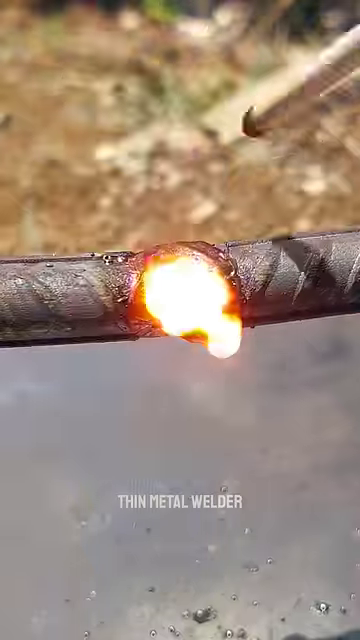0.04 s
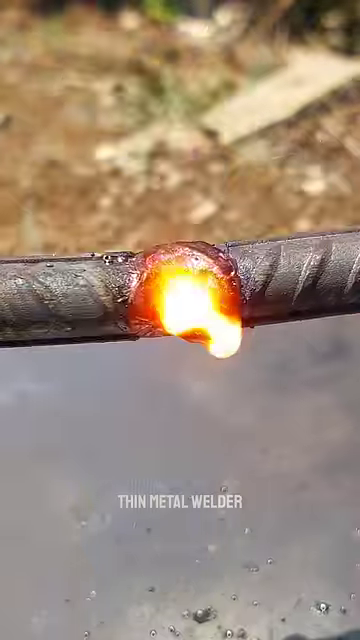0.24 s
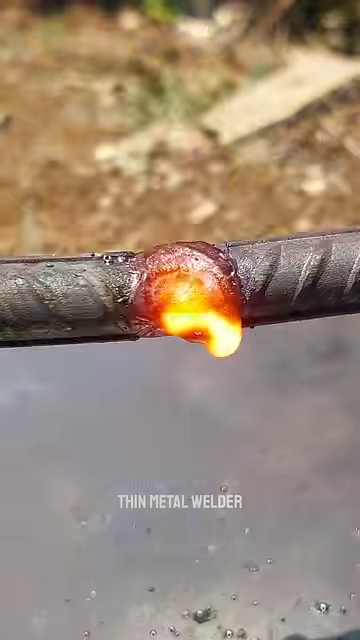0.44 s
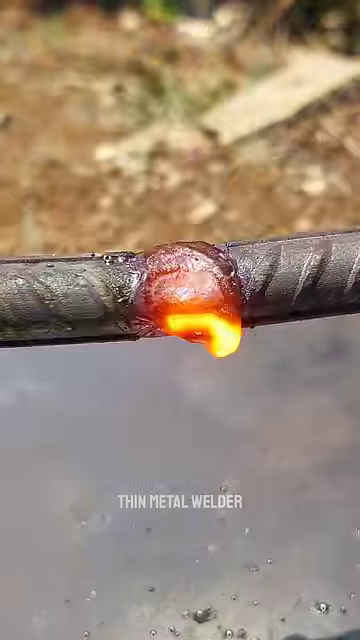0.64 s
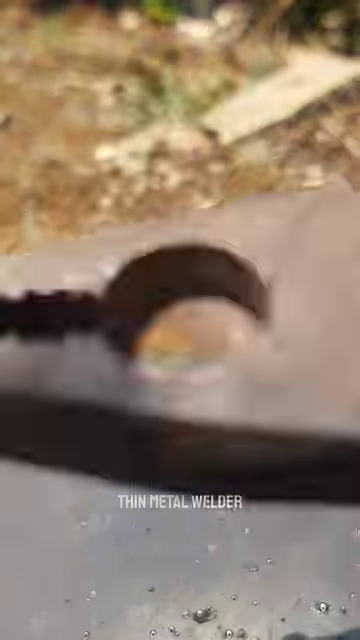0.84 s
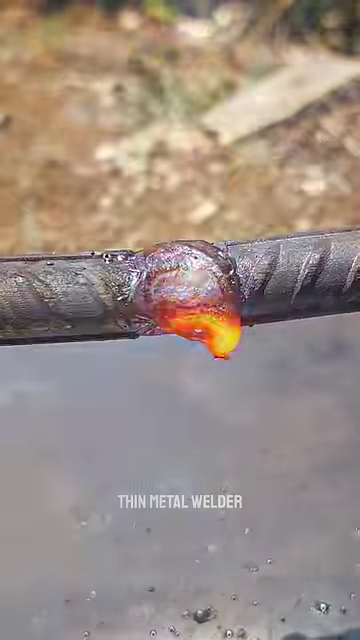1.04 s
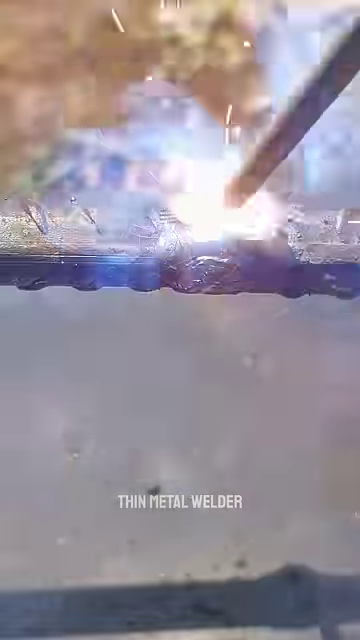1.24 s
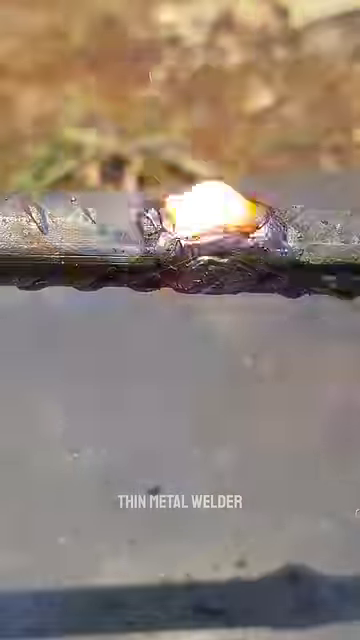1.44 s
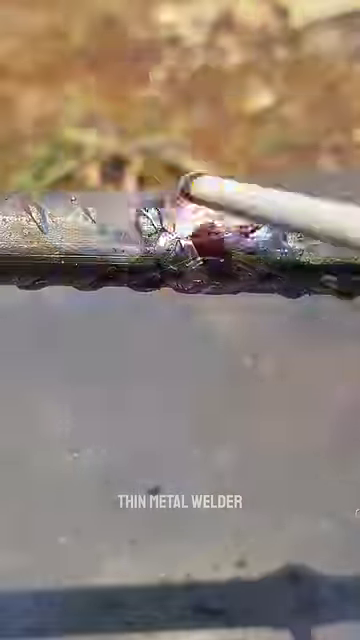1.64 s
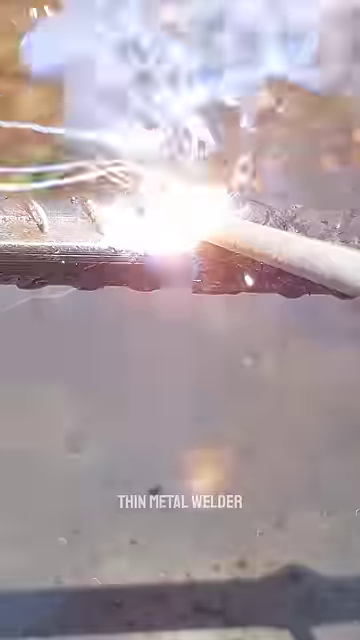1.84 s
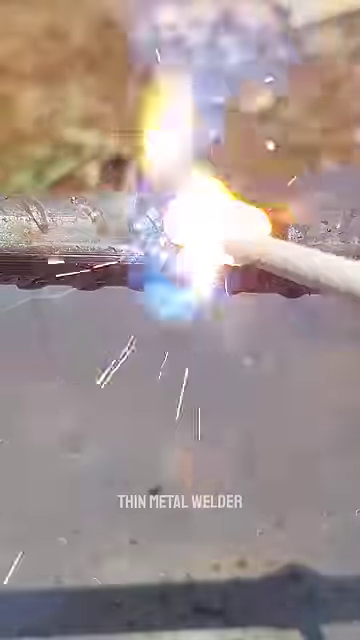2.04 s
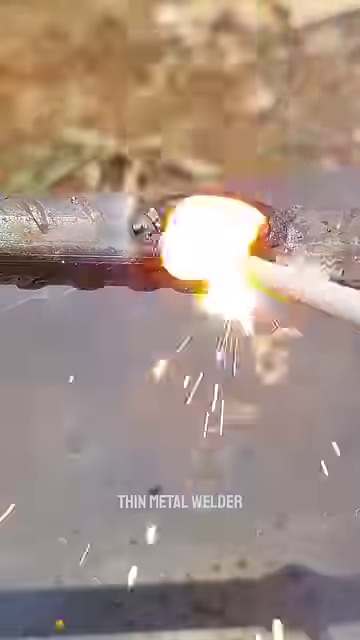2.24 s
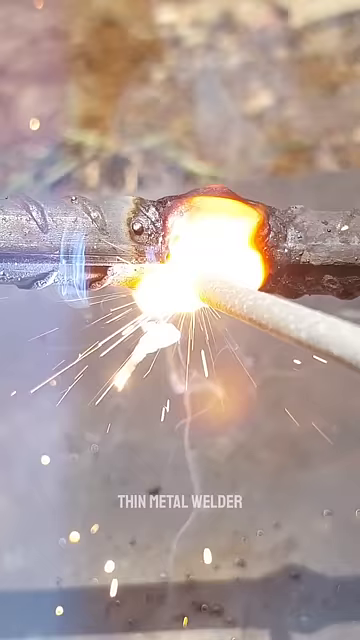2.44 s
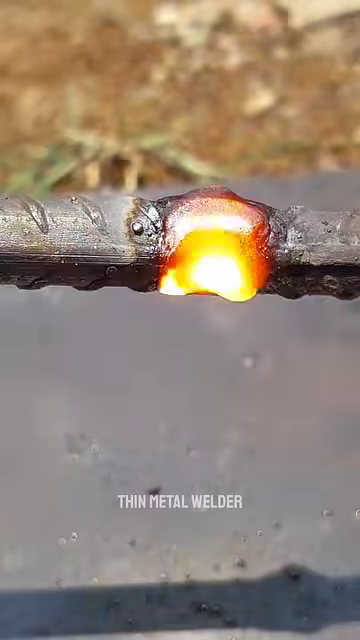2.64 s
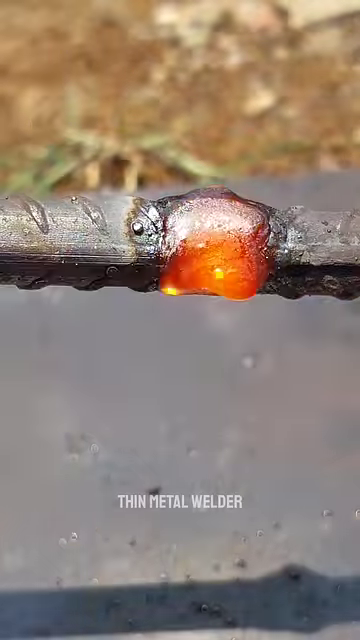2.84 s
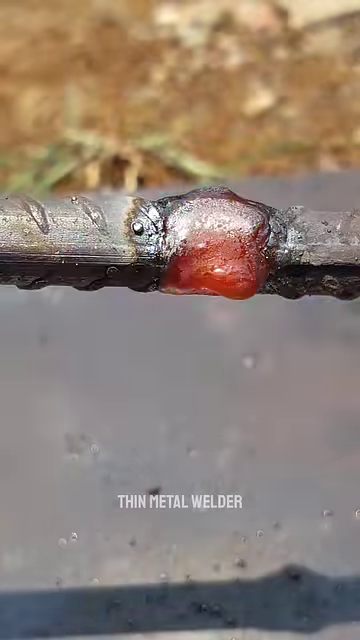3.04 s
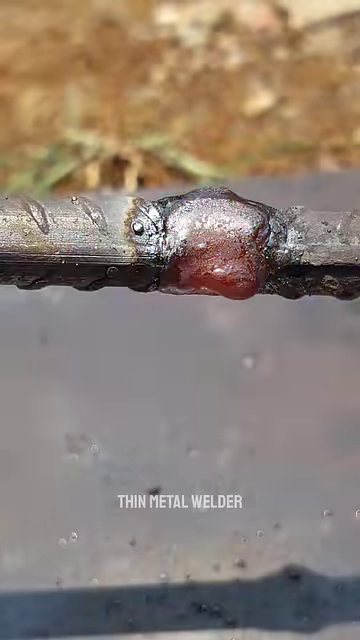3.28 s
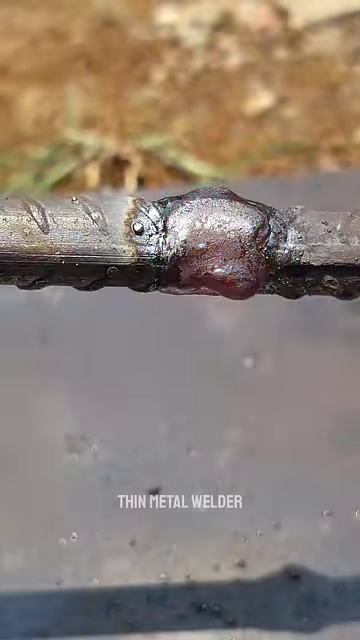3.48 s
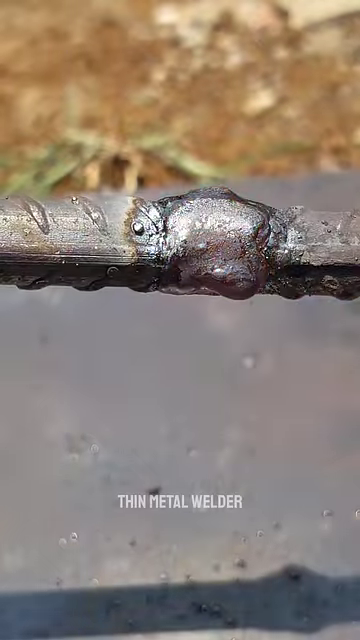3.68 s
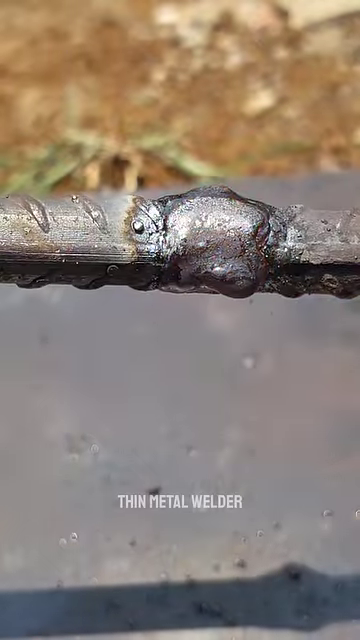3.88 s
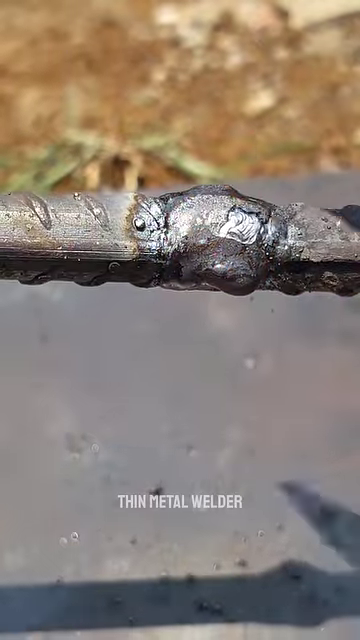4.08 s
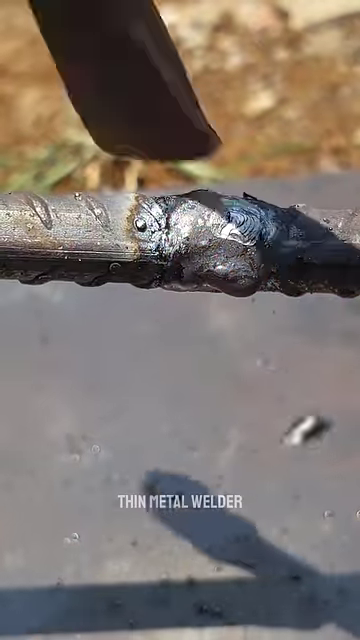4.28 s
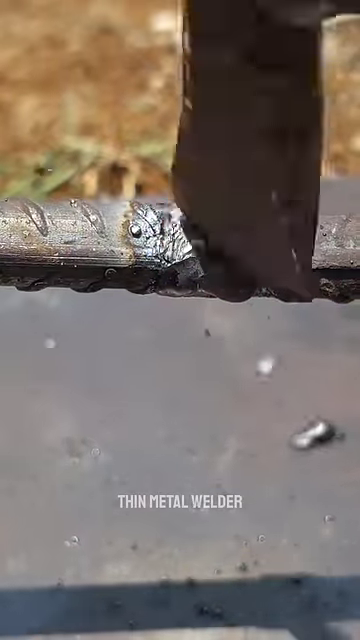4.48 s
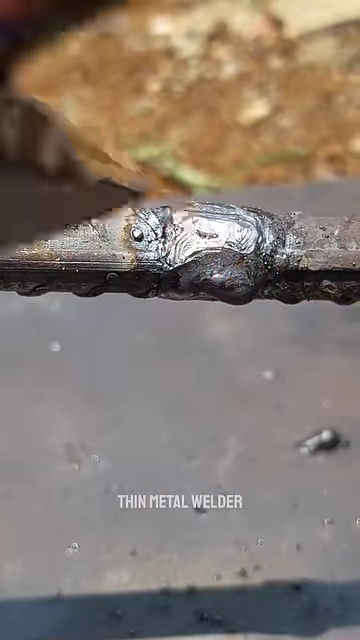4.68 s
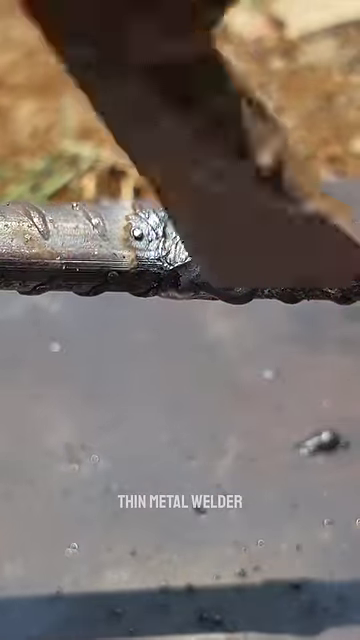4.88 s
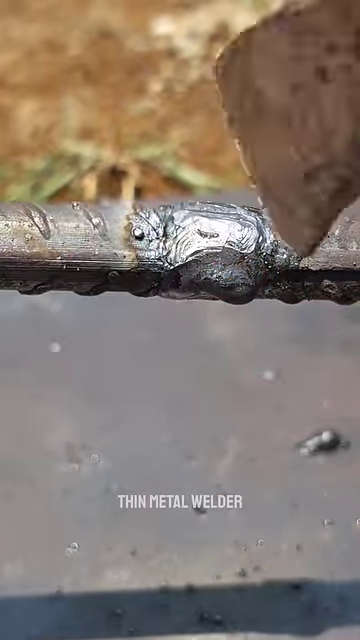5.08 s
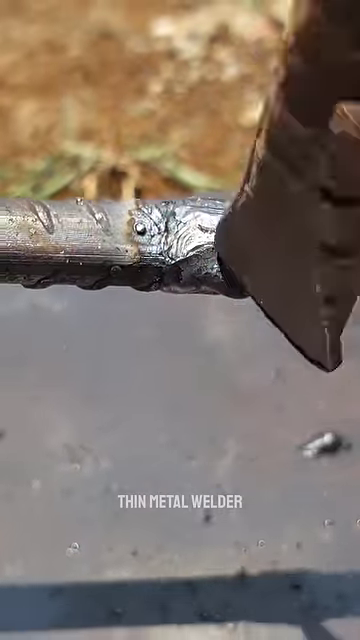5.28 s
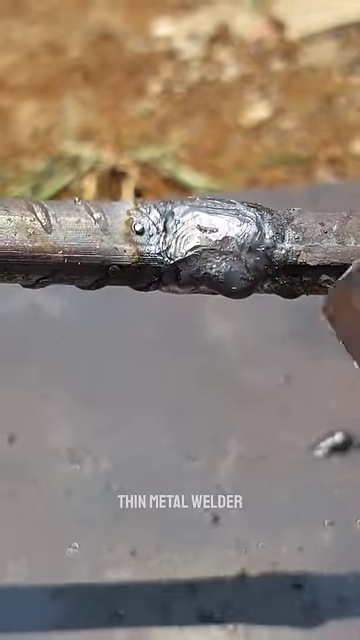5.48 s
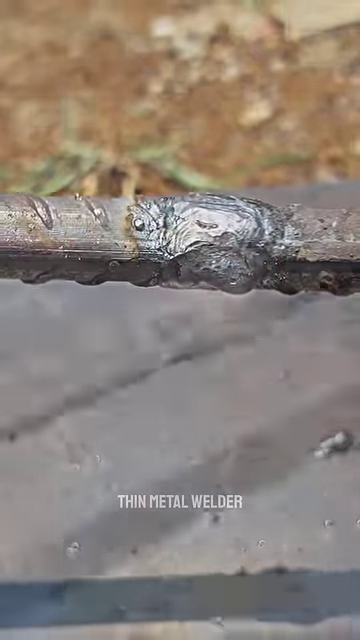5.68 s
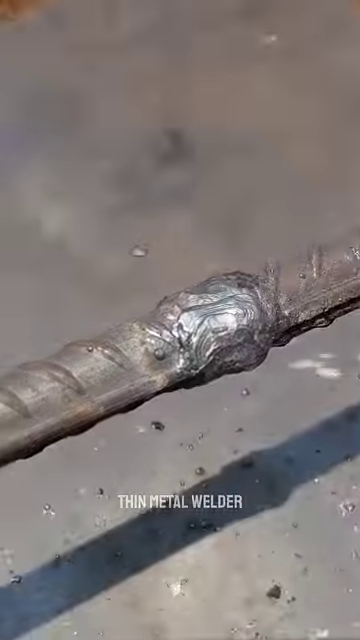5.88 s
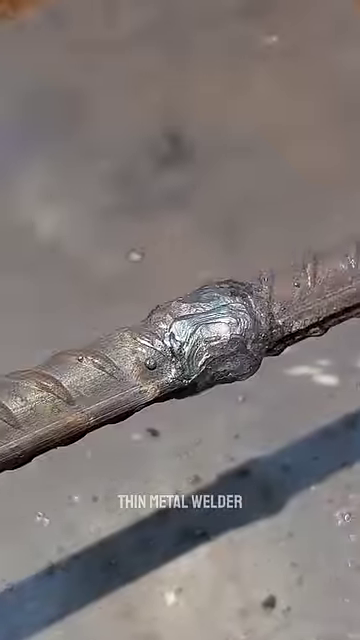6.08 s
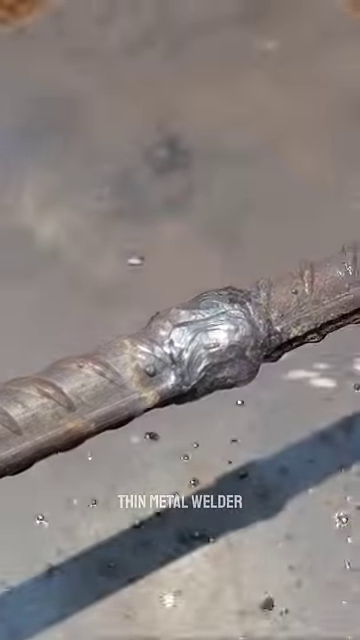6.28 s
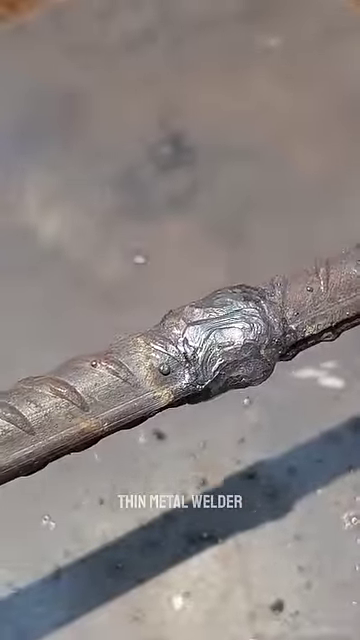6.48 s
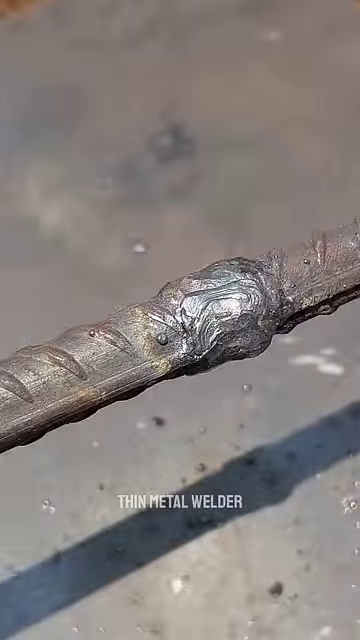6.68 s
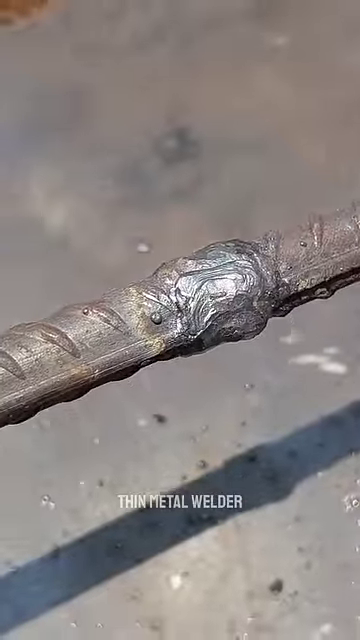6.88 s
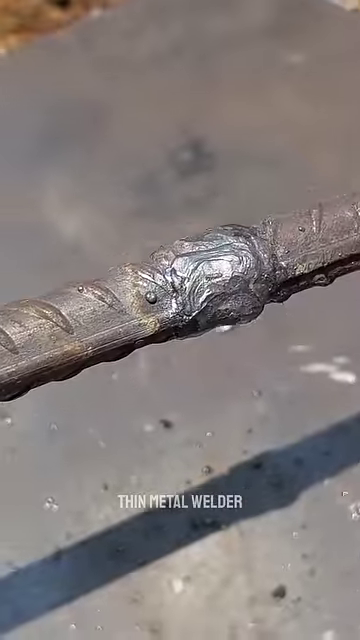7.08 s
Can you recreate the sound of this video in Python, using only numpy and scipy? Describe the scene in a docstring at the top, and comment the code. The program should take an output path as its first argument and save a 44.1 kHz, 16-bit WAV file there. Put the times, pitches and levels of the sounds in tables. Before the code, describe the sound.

Outdoors, a welding arc gives a tiny spit, followed by a faint clink and two knocks. The arc then burns in two short bursts of bright hiss, sharp crackles and low growl. Cooling slag fizzes softly, and a hammer chips it off the steel bar in quick runs of short metallic knocks. A faint hum with a wavering machine tone continues underneath, and light wind rumbles on the close stereo microphone.

```python
"""Arc welding outdoors. The arc flashes briefly over a yard's hum and steady machine tone, while wind
buffets two microphone ports. Cooling slag fizzes, a small part clinks and a hammer knocks twice.
From 1 s to 2.5 s the arc burns twice more: its sparks hiss, single discharges spit, and it growls.
The slag fizzes again. From 3.7 s to 6 s the hammer knocks it off, exciting the normal modes of the
steel bar and of its own head; the crowded knocks fade in and are cut short. The yard hums on."""
import sys
import numpy as np
from scipy import signal
from scipy.fft import rfft, irfft, next_fast_len
from scipy.io import wavfile
from scipy.ndimage import uniform_filter1d, map_coordinates

SR = 44100
rng = np.random.default_rng(int(sys.argv[2]) if len(sys.argv) > 2 else 0)


def store_pcm(level_fs):
    """Save levels as 16-bit WAV."""
    pcm = np.round(np.clip(level_fs, -1, 1) * 32767).astype(np.int16)
    wavfile.write(sys.argv[1], SR, np.atleast_2d(pcm).T)


N = 314300
T = np.arange(N) / SR


def amp(db):
    return 10 ** (np.asarray(db) / 20)


def unit(x):
    return x / np.sqrt(np.mean(x ** 2) + 1e-20)


def along(points, hz):
    """Interpolation of (frequency [Hz], value) points on a logarithmic axis."""
    f, v = np.transpose(points)
    return np.interp(np.log(hz + 1), np.log(f + 1), v)


def curves(*tables):
    """Linear interpolation in time of each column after the first."""
    s, *cols = np.transpose(np.concatenate(tables))
    return [np.interp(T, s, c) for c in cols]


def gate(tables):
    """A soft-edged window: 1 within each table's time span, 0 outside."""
    inside = sum((T >= rows[0][0]) & (T <= rows[-1][0]) for rows in tables)
    return uniform_filter1d(inside * 1., size=300)


def wobble(rate):
    """Smooth random modulation, rate knots a second."""
    return map_coordinates(rng.standard_normal(int(N * rate / SR) + 4), [T * rate])


def filtered(x, response):
    """Linear filtering by a complex frequency response."""
    m = next_fast_len(x.shape[-1] + 4096)
    return irfft(rfft(x, m) * response(np.fft.rfftfreq(m, 1 / SR)), m)[..., :x.shape[-1]]


def coloured(x, spectrum):
    """Zero-phase filtering by (frequency [Hz], gain [dB]) points."""
    return filtered(x, lambda hz: amp(along(spectrum, hz)))


def ports(x, coherence, lag):
    """Partial coherence: two signals mix into two ports, the left delayed by lag samples."""
    def mix(hz):
        turn = np.arccos(np.clip(along(coherence, hz), 0, 1)) / 2
        shift = np.exp(-1j * np.pi * hz * lag / SR)
        return np.array([[shift * np.cos(turn), shift * np.sin(turn)],
                         [np.cos(turn) / shift, -np.sin(turn) / shift]])
    return filtered(x[None], mix).sum(axis=1)


def rush(spectrum, patchy_db):
    """Two uncorrelated noises of unit rms, sharing random patches of gain in time and frequency."""
    z = signal.stft(rng.standard_normal((2, N)), nperseg=512)[2]
    field = uniform_filter1d(uniform_filter1d(rng.standard_normal(z.shape[1:]), 6, 0), 10, 1)
    pair = signal.istft(z * amp(patchy_db * unit(field)), nperseg=512)[1][:, :N]
    return unit(coloured(pair, spectrum))


# spectrum of the discharge: (frequency [Hz], spectral level [dB])
PLASMA = [(290, -22), (500, -19), (2390, 2), (3260, 2.5), (4310, -0.5), (5710, 4), (7440, 4), (10300, 0),
          (12700, 9.5), (15300, -2.5), (17000, -32)]
def plasma_hiss():
    """Shot noise: dense sparks over a fluttering Gaussian hiss."""
    strength = amp(5 * rng.exponential(size=(2, N)).clip(0, 3))
    sparks = strength * rng.standard_normal((2, N)) * (rng.random(N) < .012)
    crackle = (rng.standard_normal((2, N)) + .4 * unit(sparks)) * amp(1.5 * wobble(60) + 1.5 * wobble(250))
    return unit(coloured(crackle, PLASMA))


def small_spits(hiss_db, burning, per_s=24):
    """A Poisson process of small discharges whose strength follows the hiss."""
    at = np.flatnonzero((rng.random(N) < per_s / SR) & (burning > .99) & (T > .01))
    db = hiss_db[at] + 18 + 3.5 * rng.standard_normal(N)[at]
    return list(zip(T[at], db, db - 6))


# the loudest discharges: (time [s], spit level [dB], thump level [dB])
SPITS = [(1.0071, -16, -8), (1.019, -23, -11), (1.0254, -18, -3), (1.0328, -19, -8), (1.045, -18, -22),
         (1.0644, -15.5, -17), (1.11, -10, -29), (1.1472, -9.5, -28), (1.1606, -9.5, -26),
         (1.1755, -4, -29), (1.1874, -17.5, -20), (1.1976, -16.5, -15), (1.244, -6.5, -34),
         (1.2733, -8, -24), (1.342, -7.5, 2), (1.3504, -6.5, -23), (1.6725, -32, -4), (1.782, -13.5, -29),
         (1.851, -10.5, -25), (1.8781, -0.5, 7), (1.9043, -6, -35), (1.9468, -2, -23), (1.9746, -13, -25),
         (1.9854, -1.5, -27), (2.0205, -3, 8), (2.0368, 0, -19), (2.07, -3.5, -21), (2.0834, -3, -9),
         (2.091, -1, -9), (2.2062, -4.5, -19), (2.254, -4.5, 8), (2.2635, -13.5, -9), (2.291, -5.5, -11),
         (2.3145, -3, -17), (2.32, -1, 1), (2.345, -2, -4), (2.377, -18, -11), (2.4344, -0.5, -15),
         (2.4424, 5, -12), (2.4597, -1, -35)]
def spits(hiss_db, burning):
    """Impulsive discharges: a sharp front in a short fizzle, and a damped 500 Hz resonance as thump."""
    snaps, kicks, t = np.zeros((2, N)), np.zeros(N), np.arange(-60, 300) / SR
    fizzle = amp(-18 - np.abs(t) * np.where(t < 0, 9000, 3500) / 0.78)
    for s, db, thump_db in SPITS + small_spits(hiss_db, burning):
        burst = fizzle * rng.standard_normal((2, len(t))) * [[1], [.5]]
        burst[0, 59:62] += -.3, 1.4, -.8  # the front
        snaps[:, round(s * SR) - 60:][:, :len(t)] += amp(db) * burst
        kicks[round(s * SR)] = amp(thump_db)
    snaps = filtered(snaps, lambda hz: amp(.3 * along(PLASMA, hz)))  # broader in band than the hiss
    thumps = filtered(kicks, lambda f: 700j * f / (500 ** 2 - f * f + 700j * f) * 700 / (700 + 1j * f))
    return snaps, thumps


# reflections from the bench: (delay [ms], gain [dB])
BENCH_ECHOES = [(.52, -21.5), (1.25, -34), (1.9, -19.5)]
def bench_response(hz):
    """Comb filtering: direct sound interferes with its reflections."""
    return 1 + sum(amp(db) * np.exp(-2j * np.pi * hz * ms / 1000) for ms, db in BENCH_ECHOES)


# three burns, each a list of (time [s], hiss level [dB], growl level [dB])
BURNS = [
    [(0, -26.5, -36), (.027, -35, -33), (.032, -40, -50)],
    [(0.98, -57, -48), (1.022, -47.5, -42.5), (1.13, -41, -57), (1.26, -33.5, -43), (1.396, -38.5, -37.5),
     (1.405, -61, -55)],
    [(1.775, -31, -43), (1.807, -31.5, -37), (1.97, -34.5, -48.5), (2.113, -31.5, -47), (2.271, -32, -37.5),
     (2.39, -35, -46), (2.42, -32.5, -37), (2.498, -32.5, -44)],
]
def arc():
    """A gas discharge radiates broadband noise: hiss and spits with their echoes, over a low growl."""
    hiss_db, growl_db = curves(*BURNS)
    burning = gate(BURNS)
    hiss = amp(hiss_db) * burning * plasma_hiss()
    snaps, thumps = spits(hiss_db, burning)
    bright = ports(filtered(hiss + snaps, bench_response), [(500, .92), (3000, .9), (15000, .7)], lag=-8.5)
    lean_left = [(2000, .3), (6000, .3), (13000, 4)]
    bright = filtered(bright, lambda hz: amp(along(lean_left, hz) * np.array([[1], [-1]])))
    growl = rush([(25, -44), (90, -6), (220, -5), (600, -5.5), (1000, -14), (2500, -12.5), (5000, -62)],
                 patchy_db=3.5)
    growl *= amp(growl_db + 2.5 * wobble(70) + 3 * wobble(25)) * burning
    return bright + thumps + ports(growl, [(200, 0.99), (2000, 0.46)], lag=-12.5)


# spectra of the yard's hum and of its airy hiss: (frequency [Hz], spectral level [dB])
HUM = [(35, -45.5), (60, -22.5), (182, -10.5), (232, -6), (313, -2), (469, -7.5), (540, -3.5), (600, -9),
       (852, -17), (1090, -12), (1600, -18), (2620, -26.5), (4000, -32.5), (5200, -47), (8800, -120)]
AIR = [(1180, -22), (2000, -2), (2590, -7.5), (3610, -6.5), (4990, -9), (5910, -14.5), (6700, -14.5),
       (8380, -22), (15100, -27), (17000, -58)]
# the background sinks and returns: (time [s], hum level [dB], hiss level [dB], tone level [dB])
YARD_LEVELS = [(0.0, -49.5, -61.5, -55), (0.27, -45.5, -55.5, -50.5), (0.466, -43, -54, -45),
               (0.65, -43.5, -56.5, -55), (0.9, -41.5, -54, -58), (1.45, -52.5, -62, -56),
               (1.7, -47.5, -54.5, -52.5), (2.52, -55.5, -64, -52.5), (2.83, -46, -54.5, -46),
               (3.456, -46.5, -55.5, -45.5), (3.8, -46, -56.5, -57.5), (4.02, -51, -57.5, -64),
               (4.65, -54, -69, -57.5), (4.93, -51.5, -64, -53.5), (5.12, -47.5, -54.5, -54),
               (5.47, -57, -64.5, -63), (5.64, -56, -65, -60.5), (5.88, -46, -56, -47),
               (6.03, -46.5, -54.5, -57.5), (6.292, -45.5, -55, -45.5), (6.6, -46.5, -54.5, -56),
               (6.75, -45, -54, -45.5), (7.127, -45.5, -54.5, -52)]
# the yard's direction shifts twice: (start [s], end [s], lag of the left port [samples])
YARD_LAGS = [(0, 3.1, -8), (3.1, 5.85, 3), (5.85, 7.2, 12)]
def yard():
    """Ambient noise and a wavering machine tone, given a direction by the arrival-time difference."""
    hum_db, hiss_db, tone_db = curves(YARD_LEVELS)
    tone_hz = 537.3
    tone = np.sqrt(2) * amp(tone_db + 0.73 * wobble(7.1) + 3.1 * wobble(22))
    tone *= np.sin(2 * np.pi * tone_hz * T + 0.54 * wobble(21))
    far = amp(hum_db + 0.16 * wobble(12)) * rush(HUM, patchy_db=1.97)
    far += amp(hiss_db) * rush(AIR, patchy_db=.4)
    far[0] += tone
    coherence = [(200, 0.98), (1500, 0.55), (4000, 0.17), (9000, 0.3)]
    return sum(gate([[(start,), (end,)]]) * ports(far, coherence, lag) for start, end, lag in YARD_LAGS)


# strength of the buffeting: (time [s], level [dB])
GUSTS = [(0.0, -47.5), (0.67, -52.5), (0.99, -38), (1.25, -46), (1.43, -86), (1.72, -73), (1.94, -69),
         (2.34, -52), (2.52, -75), (3.29, -58), (3.71, -61), (4.4, -54.5), (4.64, -78.5), (5.13, -55),
         (5.29, -56.5), (5.47, -79), (5.83, -76), (7.12, -75)]
# its spectrum: (frequency [Hz], spectral level [dB])
RUMBLE = [(12, -26), (20, -4.5), (70, 3), (172, -7.5), (226, -26.5), (300, -21.5), (390, -39), (660, -120)]
def wind():
    """Turbulent pressure buffets the ports, fluctuating slowly on the left and fast on the right."""
    lumps = amp(2.6 * np.array([wobble(5.1), wobble(39)]))
    rumble = ports(rush(RUMBLE, patchy_db=3), [(30, 0.5), (150, 0.84)], lag=0)
    return amp(curves(GUSTS)[0] + [[-1.6], [1.6]]) * unit(lumps * rumble)


# fizzes of slag: (peak time [s], level [dB], 20 dB swell time [s], 20 dB fade time [s])
FIZZES = [(0.038, -42.5, 0.0044, 0.052), (.334, -53.5, 0.18, .03), (.43, -59.5, 0.056, .25),
          (.546, -42.5, 0.01, 0.013), (.6, -54, 0.053, 0.17), (1.405, -48, 0.0062, 0.17),
          (2.502, -49, .004, 0.11), (2.674, -62, .05, 0.027), (2.78, -60.5, 0.12, 2.5),
          (3.068, -49, .08, 0.056), (3.142, -58, 0.069, .02), (3.28, -60, 0.13, .06),
          (3.403, -38, 0.016, 0.054), (3.668, -85, 0.01, 0.014), (3.99, -60, .025, .06)]
def slag_fizz(cold_s=3.5):
    """Cooling slag emits treble noise that grows and decays exponentially; the long fizz ends at cold_s."""
    fizz = rush([(2500, -1.5), (5000, -4), (9000, -10), (13000, -5), (16000, -13)], patchy_db=-1)
    level = np.zeros(N)
    for s, db, swell, fade in FIZZES:
        drop_db = 20 * np.where(T < s, (s - T) / swell, (T - s) / fade)
        level += amp(db - drop_db) * ((T < cold_s) | (fade < 1))
    flicker = amp(1.7 * wobble(72) + 2.3 * wobble(260))
    return level * flicker * ports(fizz, [(5000, 0.34)], lag=-7)


def cut_envelope(t, rise, length):
    """Amplitude envelope that fades in and is cut short; a faint remnant decays exponentially."""
    fall = np.clip((t - rise) / (length - rise), 0, None) ** 2.3
    return np.sin(np.pi / 2 * np.clip(t / rise, 0, 1)) ** 2 * (amp(-19 * fall) + amp(-21 - 60 * t / 0.1))


# phase difference of the modes between the ports: (frequency [Hz], lead of the left port [rad])
PHASE_LEADS = [(620, 1.07), (1030, -1.7), (1810, 1.64), (2500, -4.5), (3620, 2.3), (4740, -1), (7060, -2),
               (8700, 0)]
def ringing(modes, t, spread_db, phase_scatter):
    """Beating: each resonance is three close modes of random strength, phased differently at each port."""
    hz, width, db = np.transpose(np.repeat(modes, 3, axis=0))[:, :, None]
    detune, start, strength, skew, lean = rng.standard_normal((5, *hz.shape))
    place = np.arange(len(hz))[:, None] % 3 - 1  # below, at and above the centre
    phase = 2 * np.pi * (hz + width * (0.49 * place + 0.2 * detune)) * t + 3 * start
    cluster_strength = np.repeat(strength[::3], 3, axis=0)[::-1]
    gain = amp(db - 1.3 * np.abs(place) + spread_db * (strength + cluster_strength)) * np.sqrt(width)
    lead = along(PHASE_LEADS, hz) / 2 + phase_scatter * skew * np.clip(hz / 3500, .3, 1.6)
    return np.array([(gain * np.sin(phase + side * lead) * amp(side * 2.5 * lean)).sum(axis=0)
                     for side in (1, -1)])


# resonances of a small steel part: (frequency [Hz], width [Hz], level [dB])
PART_MODES = [(4290, 25, -12), (4940, 11, 5), (6240, 24, -9), (10700, 20, -12), (11900, 28, -37),
              (13800, 25, -27)]
def clink():
    """Free vibration of a small steel part, heard for a moment."""
    out, t = np.zeros((2, N)), np.arange(SR // 16) / SR
    ring = unit(ringing(PART_MODES, t, spread_db=0.6, phase_scatter=0.3))
    ring += 0.4 * rng.standard_normal((2, len(t)))
    out[:, round(.314 * SR):][:, :len(t)] = amp(-37.5) * ring * cut_envelope(t, rise=0.019, length=0.043)
    return out


# loose slag: (frequency [Hz], spectral level [dB])
CLATTER = [(88, -46), (150, -15.5), (437, -21.5), (624, -3), (856, -19.5), (983, -8), (1520, -19),
           (1710, -15), (1850, -14), (4700, -10.5), (8500, -21.5), (12400, -17.5), (15400, -26),
           (17000, -46)]
def slag_rattle(t):
    """Rattling slag fills the gaps between the modes with a continuous spectrum."""
    noise = unit(coloured(rng.standard_normal((2, len(t))), CLATTER))
    return ports(noise, [(500, 0.81), (3000, 0.23), (9000, 0.29)], lag=1.33)


# resonances of the bar and its bench: (frequency [Hz], width [Hz], level [dB])
BAR_MODES = [(339, 120, -17), (624, 120, -8), (1000, 81, -1), (1410, 29, -14), (1727, 36, -3),
             (2190, 120, -7), (2800, 77, -11), (3570, 110, -6), (3810, 51, -6), (4060, 56, -6),
             (4740, 55, -4), (5440, 62, -13), (6350, 44, -7), (7080, 56, -8), (7420, 54, -18),
             (7970, 140, -23), (8190, 36, -23), (9150, 110, -20), (9730, 100, -21), (10100, 74, -22),
             (11000, 83, -19), (11600, 120, -17), (12000, 180, -18), (12900, 61, -20), (13900, 50, -25),
             (14100, 34, -26), (14900, 83, -20)]
def struck_bar(t, rattle, db, bright_db):
    """Impact excites the bar's modes and shakes its stand; softer knocks are bassier and duller."""
    thud = unit(filtered(rng.standard_normal((2, len(t))), lambda hz: hz ** 2 / (1 + (hz / 85) ** 4.9)))
    body = unit(ringing(BAR_MODES, t, spread_db=3.5, phase_scatter=0.6)) + rattle
    thud_db = -29.5 - 0.35 * db - 0.6 * bright_db
    bass_db = -8 - 0.47 * db - 0.69 * bright_db
    treble_db = 0.97 + 0.16 * db + 0.87 * bright_db
    tilt = [(700, bass_db - 5), (900, bass_db), (1300, bass_db), (2100, 0.5 * bass_db), (4500, 0.012),
            (7300, 0.22 * treble_db), (8200, treble_db)]
    return coloured(body, tilt) + amp(thud_db) * thud


def crack(t, rattle, rise_ms, t60=0.018):
    """Contact transient near 3 kHz: the sharper the onset, the louder it is."""
    noise = unit(filtered(rattle[:, ::-1], lambda hz: 0.29 + 1 / (1 + ((hz - 3000) / 570) ** 2)))
    return amp(7 - 2 * rise_ms - 60 * t / t60) * (t > 0) * noise


# modes of the hammer head: (frequency [Hz], 60 dB decay time [s])
HEAD_MODES = [(4620, 0.15), (6350, .06)]
def head_ring(t, envelope, rise, levels_db):
    """Damped free vibration: the head's two modes sound with the knock and ring on after it."""
    window = np.clip(t / (rise + .002), 0, 1) * np.cos(np.pi / 2 * t / t[-1])
    ring = np.zeros((2, len(t)))
    for (hz, t60), db, tail_db in zip(HEAD_MODES, levels_db, (10, -18)):
        tail = amp(tail_db - 60 * t / t60) * window
        ring += amp(db) * (envelope + tail) * np.sin(2 * np.pi * hz * t + rng.uniform(0, 0.85, (2, 1)))
    return ring


# hammer blows: (time [s], rise [ms], length [ms], level [dB], brightness [dB], long head ring [dB],
# short head ring [dB], favoured mode [Hz], its relative level [dB])
KNOCKS = [(0.805, 9.7, 35, -35, -2.5, -37, -32, 3840, 7), (0.956, 1.35, 25, -20, -3, -31, -34, 3750, -10),
          (3.656, 16.2, 33, -44, -2, -42, -44, 2010, -2), (3.7, 9.8, 35, -56.5, -7.5, -39, -37, 1450, -3),
          (3.828, 6.7, 80, -58.5, -3.5, -37, -37, 2070, 6.5),
          (3.978, 16, 34, -47.5, 4.5, -37, -37, 2050, -16),
          (4.032, 0.88, 8.7, -25.5, 2, -38, -39, 2214, -8), (4.076, 16, 22.4, -46, -4, -37, -37, 1584, 5),
          (4.141, 9.6, 35, -33, 6, -37, -6, 3490, 3.5), (4.185, 15, 36.5, -28.5, 3, -40, -24, 6360, 6),
          (4.233, 14.7, 36.3, -27, -0.5, -39, -5, 4280, -6),
          (4.283, 2.07, 30, -19, 2, -25, -0.5, 6350, -16), (4.325, 9.8, 36, -34, -4, -37, -34, 2100, -10),
          (4.372, 12.5, 36, -32, 3.5, -40, -22, 2050, -2), (4.442, 9.6, 38, -22, 5, -33, -17, 4370, -3),
          (4.498, 3.9, 22, -12.5, -2, -41, -39, 4720, -19),
          (4.552, 2.4, 16, -12.5, 2.5, -52, -31, 4710, -2), (4.597, 1.2, 17.3, -14, 3, -39.5, -6, 4680, -2),
          (4.697, 8.2, 37, -28.5, -0.7, -16, -34, 2050, -5),
          (4.724, 3.2, 25.4, -22.5, 3.5, -16.5, -36, 1717, -5),
          (4.771, 15, 35.4, -41.5, 0.5, -4, -37, 1660, -6),
          (4.815, 4.1, 32, -35.5, -4.5, -39, -40, 2110, 5.5),
          (4.86, 13, 30, -32.5, 0, -5.5, -39, 3195, 8.5), (4.89, 2.94, 28.8, -28, -2, -6.5, -28, 3210, -4),
          (5.138, 10.5, 37, -28.5, 1.5, -36, -36, 4260, -4.5),
          (5.189, 7.7, 27.6, -16, -9.5, -42.5, -37, 4870, -10),
          (5.234, 8.2, 30.8, -14.5, -3.5, -35, -34.5, 4870, -5),
          (5.285, 7.6, 26, -11, -4, -42, -34, 4750, -5.5), (5.331, 2.3, 26.2, -15, -1, -41, -40, 4790, -8),
          (5.372, 11, 33.8, -17, -1, -32, -35, 4740, -2),
          (5.424, 2, 29.3, -16, -6.5, -46.5, -39.5, 4740, -6),
          (5.65, 8.2, 44.5, -43.5, -1.5, -18, -36, 1397, 0), (5.698, 12, 20.6, -25, 3.5, -10, -37, 1660, 3),
          (5.72, 7.4, 27.4, -28, 2.5, -37, -37, 2030, -10), (5.769, 1.6, 8.3, -27, 3, -19, -38, 5490, -12),
          (5.784, 8, 43, -44.5, 1, -9, -37, 2440, -11), (5.816, 1.6, 13.4, -33, 5.5, -35, -35, 1810, -2),
          (5.835, 5.5, 63, -45, 0.5, -34, -10, 2200, 3.5), (5.927, 5.5, 28, -55, 15, -37, -37, 3600, 3)]
def hammer():
    """Modal superposition: bar and head ring at each blow, and the spot struck favours one mode."""
    out, t = np.zeros((2, N + SR)), np.arange(SR // 8) / SR
    pan_db = np.array([[-.5], [.5]])
    for s, rise_ms, length_ms, db, bright_db, long_db, short_db, spot_hz, spot_db in KNOCKS:
        rise = rise_ms / 1000
        lead = .35 * rise  # the fade-in starts before the knock is heard
        envelope = cut_envelope(t, rise + lead, length_ms / 1000 + lead)
        rattle = slag_rattle(t)
        bar = struck_bar(t, rattle, db, bright_db)
        spot = amp(spot_db) * np.sin(2 * np.pi * spot_hz * t + rng.uniform(0, 3.7, (2, 1)))
        knock = (bar + spot) * envelope + crack(t - lead, rattle, rise_ms)
        knock += head_ring(t, envelope, rise, (long_db, short_db))
        out[:, round((s - lead) * SR):][:, :len(t)] += amp(db + pan_db) * knock
    return out[:, :N]


def scene():
    """Linear superposition of all sources at the two ports."""
    return hammer() + clink() + arc() + yard() + slag_fizz() + wind()


# microphone response: (frequency [Hz], gain [dB])
MIC_RESPONSE = [(100, 0), (15600, -1.5), (16000, -10), (17000, -28)]
# colour difference of the ports: (frequency [Hz], left minus right [dB])
PORT_BALANCE = [(60, -5.5), (110, 2.5), (200, -2.5), (380, -0.5), (700, -3), (1290, 2), (2380, 1),
                (4400, 1), (8120, 1.5), (15000, -6.5)]
def record(dry, top_hz=17150):
    """Saturation rounds the peaks; the microphone then colours each port and limits the band."""
    def response(hz):
        db = along(MIC_RESPONSE, hz) + along(PORT_BALANCE, hz) * np.array([[.5], [-.5]])
        return amp(db) * (hz < top_hz)
    soft = dry / (1 + np.abs(dry / 1.1) ** 4) ** (1 / 4)
    return filtered(soft, response)


dry = scene()
out = record(dry)
store_pcm(out)
```